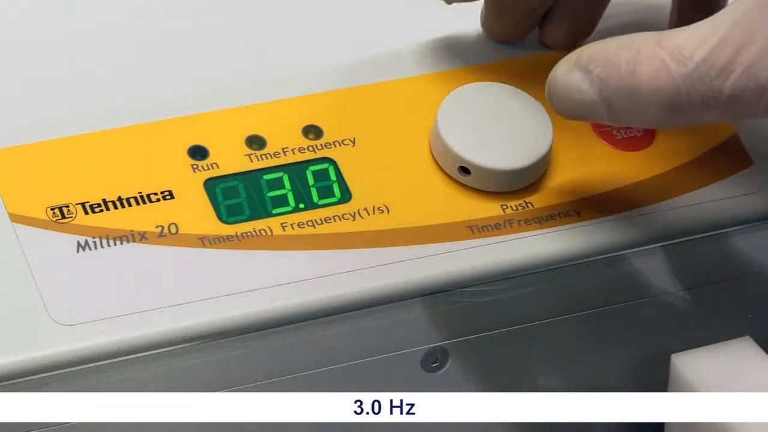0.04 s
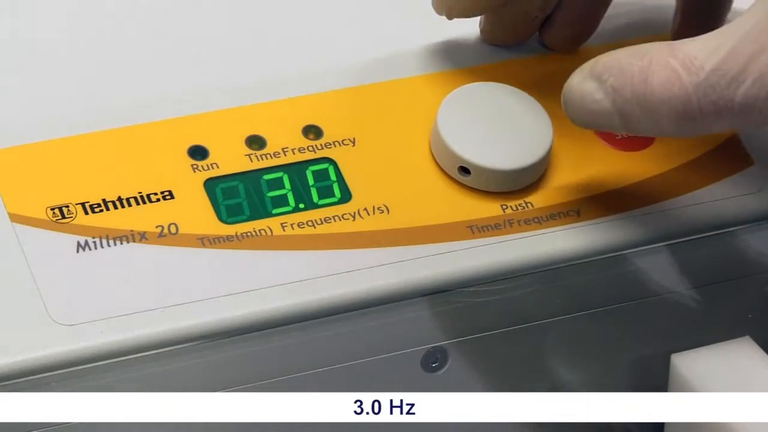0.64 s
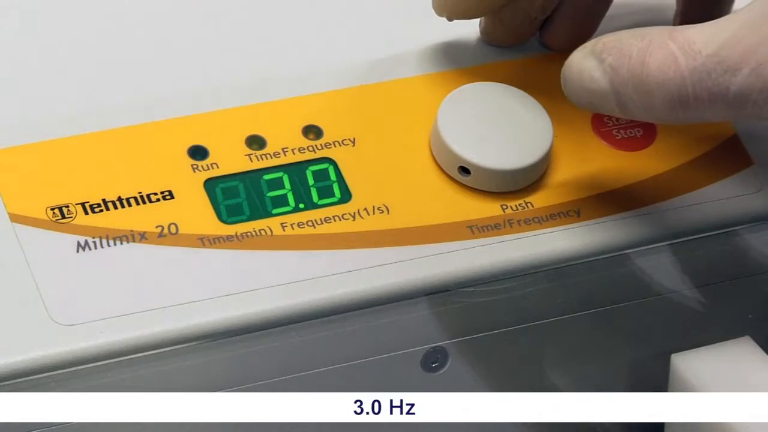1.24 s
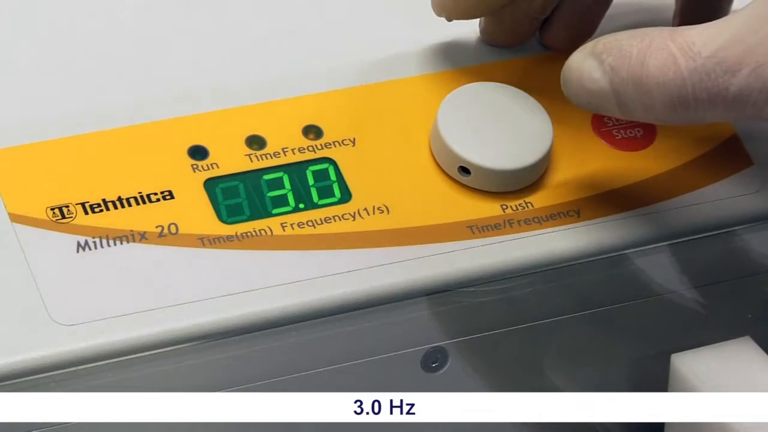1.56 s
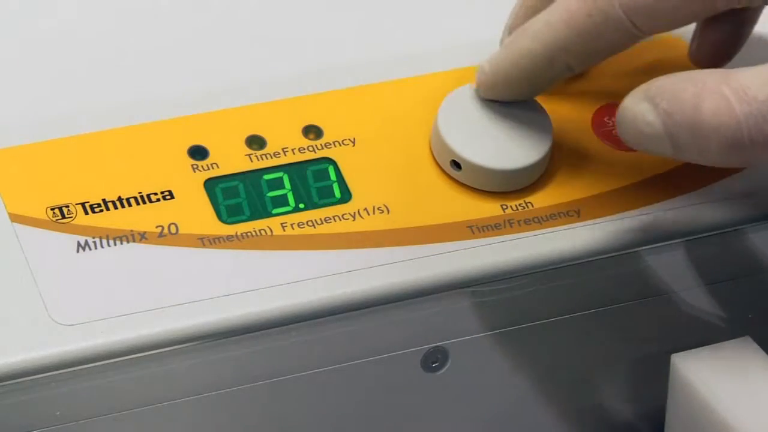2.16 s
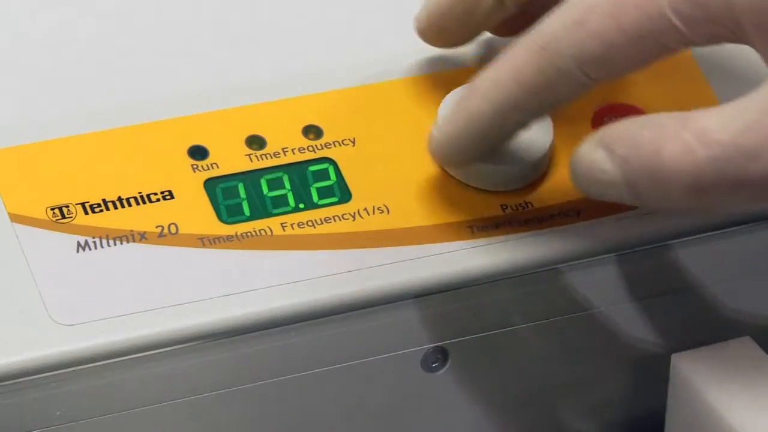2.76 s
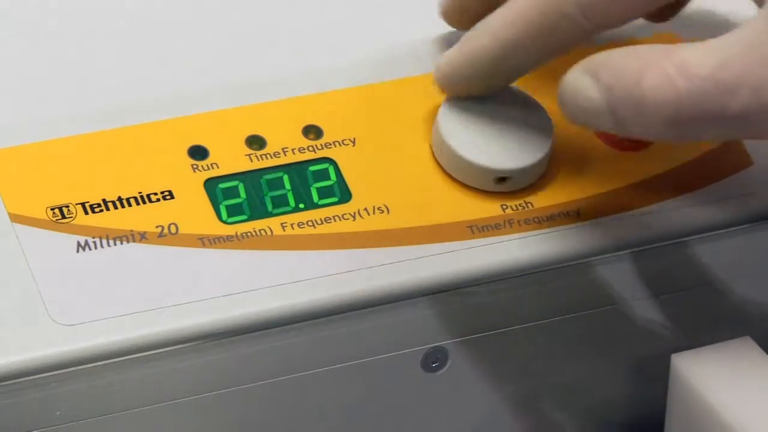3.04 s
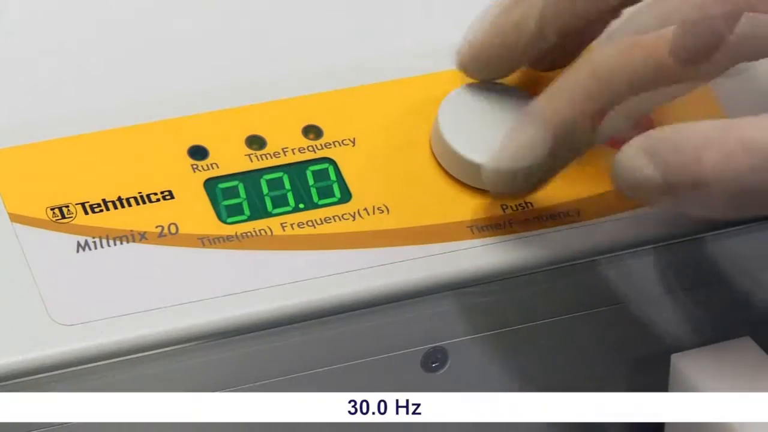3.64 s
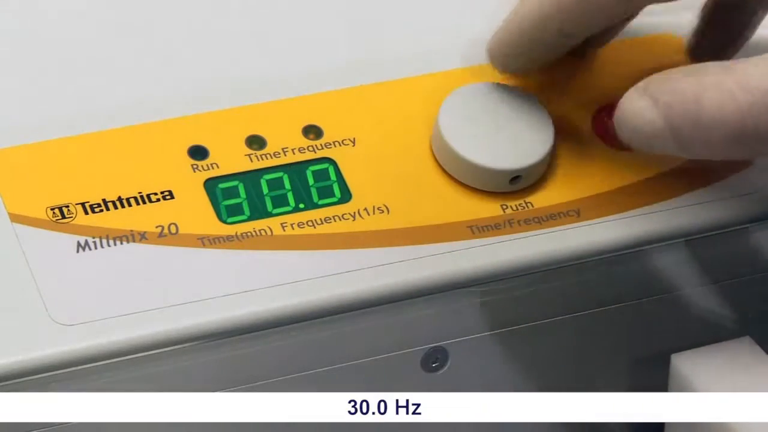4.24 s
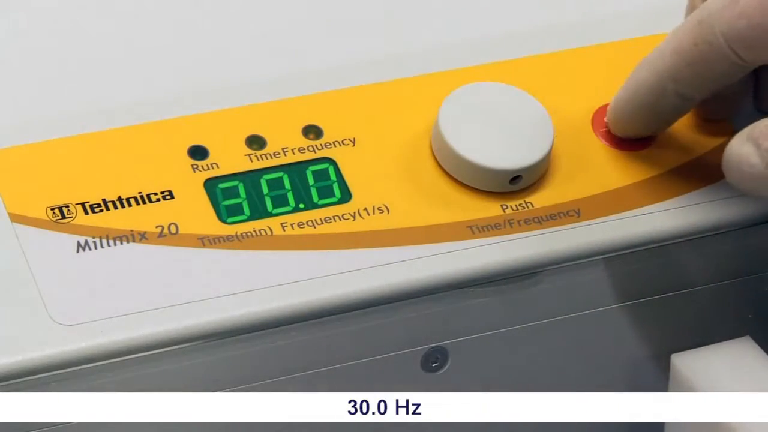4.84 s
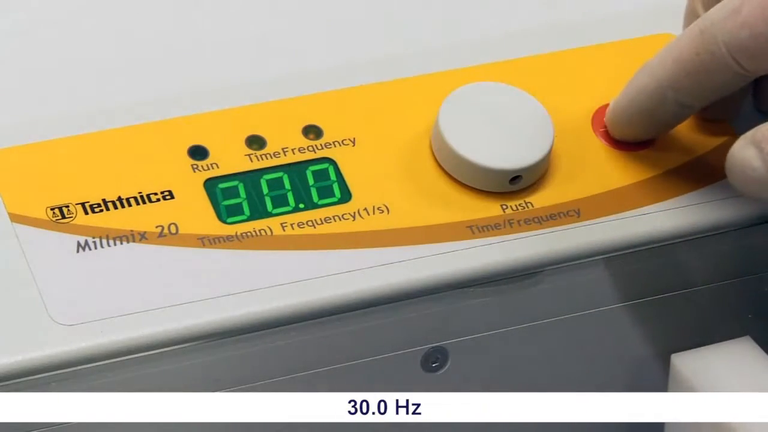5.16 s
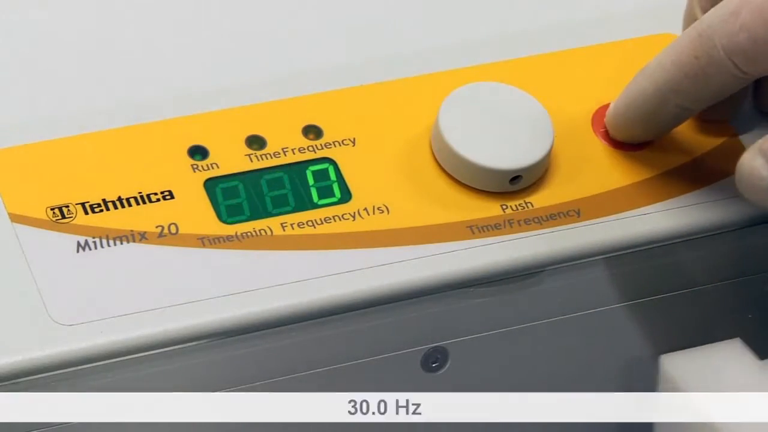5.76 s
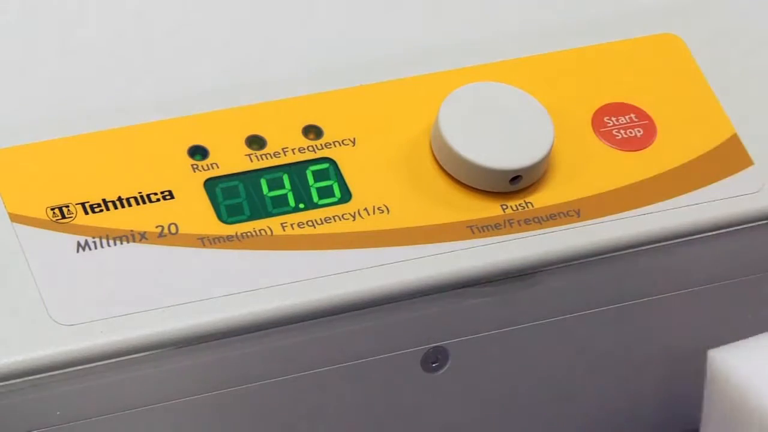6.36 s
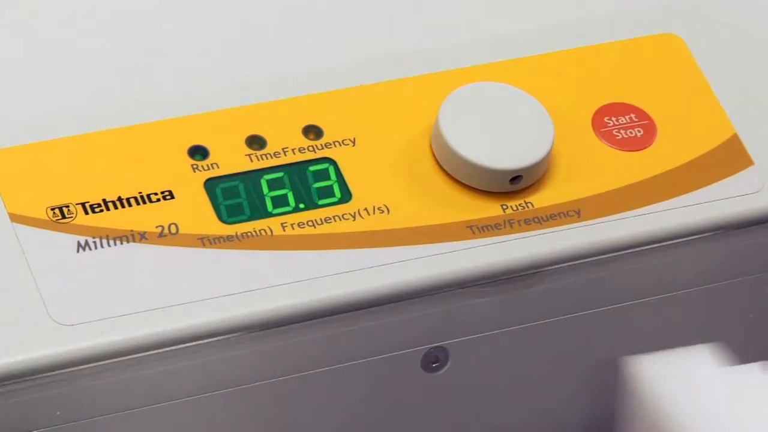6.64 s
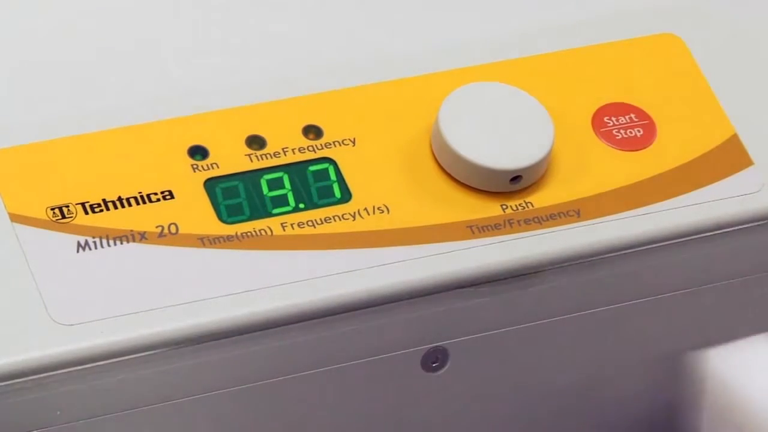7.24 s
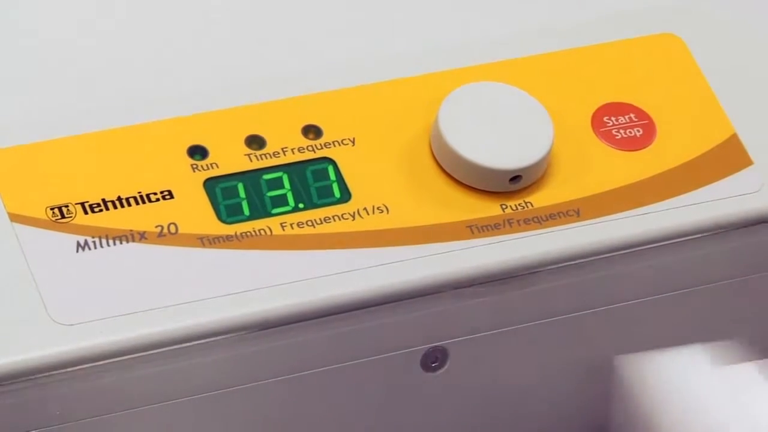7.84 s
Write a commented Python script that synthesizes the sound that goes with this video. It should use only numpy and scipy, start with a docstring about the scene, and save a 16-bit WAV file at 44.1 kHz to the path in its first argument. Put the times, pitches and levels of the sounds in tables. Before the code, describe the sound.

A low, quiet ventilation rumble runs throughout, deeper for the first two seconds, then slightly higher with a faint hum. A gloved hand brushes a control panel faintly at about 0.4 seconds and lightly bumps a knob at 0.8. At 2.9 comes a louder, dull double bump with a glove rustle and brief low ring. The sound sits on the left until about 3.9, then centres. More faint brushes precede a soft button click at 5.6.

At 5.7 a small ball mill clunks into motion, and its motor buzzes and whines upward over a low rumble. From about 6.3 steel balls roll, slide and knock inside the swinging jars. The knocks combine thuds, clacks and metallic ringing, growing faster and harder into a loud, rapid rattle that is still building at 8 seconds. One microphone by the laboratory bench catches short room reflections.

```python
"""A quiet, ventilated laboratory, one microphone by the bench where a small ball mill stands.
Over the rumble of the air, a gloved hand brushes the panel, bumps the knob and presses start.
The drive takes up its slack and the stepper motor whines upward. The steel balls knock against
the ends of the swinging jars, twice a cycle, ever faster and harder, ringing housing, holders
and jars. Bench and walls add short reflections."""
import sys
import numpy as np
from scipy import signal
from scipy.fft import rfft, irfft
from scipy.io import wavfile

SR = 44100
rng = np.random.default_rng(int(sys.argv[2]) if len(sys.argv) > 2 else 0)


def materialize(psi):
    """Save the field psi as 16-bit PCM at rate SR to the path in sys.argv[1].

    A 1-D psi becomes a single channel; in a 2-D psi each row is a channel.
    """
    bounded = np.clip(np.atleast_2d(psi).T, -1, 1)
    quanta = np.round(bounded * 32767).astype(np.int16)
    wavfile.write(sys.argv[1], SR, quanta)


N = 352359
TIME = np.arange(N) / SR

# colour of room tone, slowed down and at normal speed, and of the glove: frequency_hz, relative_db
SLOWED_TONE_SPECTRUM = [(29, -63), (50, -9), (70, -9), (177, -2.5), (253, -1.5), (371, -13), (439, -12.5),
                        (557, -19.5), (898, -20.5), (1200, -25), (1310, -24), (2120, -32), (15000, -33)]
AIR_SPECTRUM = [(29, -51), (50, -8), (70, -7), (100, -17), (134, -7.5), (162, -7.5), (238, 0), (268, -3.5),
                (333, 1.5), (434, -10), (592, -13.5), (735, -18.5), (1790, -26), (3180, -32),
                (15500, -33.5)]
GLOVE_SPECTRUM = [(300, -5), (800, 6.5), (2200, -2.5), (3700, -0.5), (5000, -4), (7000, 1), (9500, -4.5),
                  (12000, -5), (15500, -11)]
# hum of ventilation and electronics: pitch_hz, level_db
HUM_TONES = [(27.3, -66), (88, -82.5), (110, -76.5), (167, -73), (1782, -89.5), (2126, -93.5)]
# glove on the panel, stepper breaking away, slow balls sliding on the jar wall: peak_s, fade_s, level_db
GLOVE_BRUSHES = [(.35, 0.13, -72), (2.905, 0.075, -62), (4.145, 0.14, -75), (5.43, 0.072, -66)]
BREAKAWAY_BUZZES = [(5.99, 0.056, -68), (6.10, 0.061, -66)]
BALL_SLIDES = [(6.296, 0.013, -58), (6.497, 0.011, -54)]
# a finger bumps the knob; the start key snaps in: start_s, level_db, decay_s
KNOB_BUMPS = [(0.795, -62, 0.011), (1.597, -72, .004), (2.913, -43.5, 0.009), (2.951, -54, 0.0083)]
KEY_SNAP = [(5.562, -71, 0.018)]
# resonances of the mill's parts: pitch_hz, width_hz, relative_db
KNOB_MODES = [(70, 20, -23), (110, 58, 2), (171, 98, 3), (275, 26, 4.5), (410, 71, -7), (520, 41, -3),
              (662, 68, -2), (800, 150, -10), (1160, 120, -16)]
KEY_MODES = [(3470, 890, -1.8), (4250, 600, -0.19)]
FRAME_MODES = [(165, 13, -13), (230, 14, 3), (296, 26, -1), (388, 28, -2.5), (436, 29, -5), (591, 34, -2.5),
               (1199, 52, 5)]
STATOR_MODES = [(1057, 60, 1), (1230, 46, -2.4)]
HOUSING_MODES = [(87.4, 7.6, -10), (109, 26, -18), (155.4, 56, -10.5), (239, 20, -7), (334, 61, -13),
                 (397, 27, -14), (438, 61, -1), (535.4, 61, 0), (561.7, 38.7, 3), (605, 33, -2),
                 (672, 99, -13.5)]
HOLDER_MODES = [(860, 35, -1), (989, 49, 0), (1104, 106, 6), (1186, 280, 0), (1396, 80, 0.5),
                (1490, 75, -1), (1666, 120, -3), (1856, 143, -4.5), (2100, 350, -8), (2550, 490, -10),
                (2890, 240, -17.5), (3790, 130, -15), (4050, 2100, -20)]
JAR_MODES = [(3068, 110, 7), (3157, 106, 5.7), (3260, 174, 1)]
STEEL_MODES = [(4590, 130, 2.5), (5000, 110, 6), (5590, 1170, -0.5), (5900, 345, 6), (6600, 170, 5),
               (6970, 146, 4), (7250, 81, 4), (9060, 820, -15.5), (10040, 190, -18), (12800, 4900, -33.5)]
# the drive takes up its slack: start_s, housing_db, holder_db, jar_db, decay_s
SLACK_CLUNKS = [(5.746, -54, -63.5, -72, 0.015), (6.258, -62, -64, -95, 0.065)]
# the stepper's force on the frame, at the tooth rate and each multiple: level_db
TOOTH_HARMONICS = [-67.5, -74.5, -92, -90, -84.5, -89.5]
# the running mill sways on its feet: time_s, level_db
SWAY_CURVE = [(5.9, -76), (6.2, -74.5), (6.5, -70), (6.82, -61), (7.1, -83), (7.4, -68), (7.99, -75)]
# knocks that stand out from the rest: near_s, strength_db, extra_ring_db
KNOCK_ACCENTS = [(6.286, 0, -18), (6.50, 7, 0), (6.59, -0.5, -0.5), (6.67, -0.5, 6), (6.94, 3.5, 0.5),
                 (6.997, 1, 3.5), (7.056, 3.5, 0), (7.106, -0.5, -3), (7.208, -0.5, -2), (7.257, 2.5, -0.5),
                 (7.303, 3, 1), (7.349, 1.5, -4), (7.479, 1.5, -5), (7.561, -1.5, -1.5), (7.639, 3.5, 2),
                 (7.754, 2, 2.5), (7.787, 0.5, -15)]

# how the mill's forces grow with the swing rate: base_db at REFERENCE_HZ, db_per_doubling
THUD, CLACK, RING, PING = (-37.5, 8.1), (-36.5, 10.9), (-44.5, 14.4), (-53.5, 19.8)
DRIVE, ROLL, SKITTER = (-48.5, 6.8), (-66, 7.9), (-56.5, 37)
REFERENCE_HZ = 12

NORMAL_SPEED_S, SLOWED_HUM_HZ = 2.04, 20.8
TREBLE_CUT_S, TREBLE_CUT_DB_PER_S, TREBLE_CUT_HZ = 6.9, 121, 7000
ROCKING_HZ, ROCKING_T60_S, ROCKING_DB = 86, 0.8, -50
START_S, SWING_HZ_PER_S, ROTOR_TEETH, FLUTTER_DB = 5.749, 6.744, 50, 3.5
# the faster the swing, the earlier in the stroke a constant lead makes the balls land
STROKES_BEFORE_LANDING, LANDING_LEAD_S = 2.297, 0.047
END_DELAY_S, END_RING_DB, KNOCK_SPREAD_DB, CHATTER_S = 0.0018, 2.0, 1.33, 0.0067
RIGHT_OPENS_S, CUTOFF_HZ = 3.885, 15750


def from_db(db):
    """Decibels to gain."""
    return 10 ** (np.asarray(db) / 20)


def noise(spectrum):
    """Steady noise of rms 1, coloured by rows of frequency_hz, relative_db."""
    hz, db = np.transpose(spectrum)
    bins = np.maximum(np.fft.rfftfreq(N, 1 / SR), 1)
    colour = from_db(np.interp(np.log(bins), np.log(hz), db))
    x = irfft(rfft(rng.standard_normal(N)) * colour, N)
    return x / np.sqrt(np.mean(x ** 2) + 1e-20)


def sine(hz):
    """Tone of rms 1 on a steady or gliding pitch."""
    return np.sqrt(2) * np.sin(2 * np.pi * np.cumsum(hz * np.ones(N)) / SR)


def swells(rows):
    """An envelope that rises and falls once per row of peak_s, fade_s, level_db."""
    return sum(from_db(db) * np.exp(-abs(TIME - s) / fade_s) for s, fade_s, db in rows)


def push(times, levels_db):
    """One clean, hard contact per blow."""
    force = np.zeros(N)
    force[np.clip(times * SR, 0, N - 1).astype(int)] = from_db(levels_db)
    return force


def chatter(times, levels_db, decays_s, rise_s=0.0033, contacts_per_s=3000):
    """Each blow is a quick swarm of tiny contacts that swells and dies away."""
    force, t = np.zeros(N + SR), TIME[:SR // 8]
    for s, db, decay_s in np.broadcast(times, levels_db, decays_s):
        swell = (1 - np.exp(-t / rise_s)) * np.exp(-t / decay_s)
        contacts = rng.choice([-1, 1], len(t)) * (rng.random(len(t)) < contacts_per_s / SR)
        burst = swell * contacts
        burst *= np.linalg.norm(swell / swell.max()) / (np.linalg.norm(burst) + 1e-9)
        start = int(s * SR)
        force[start:start + len(t)] += from_db(db) * burst
    return force[:N]


def resonate(force, modes, low_hz, high_hz):
    """Drive a part's resonances, inside the band that it radiates; overall power gain 1."""
    click, response = signal.unit_impulse(SR // 2) + 1e-18, 0
    for k, (hz, width, db) in enumerate(modes):
        r = np.exp(-np.pi * width / SR)
        poles = [1, -2 * r * np.cos(2 * np.pi * hz / SR), r * r]
        ring = (1 - r * r) * signal.lfilter([1, 0, -1], poles, click)
        response = response + (-1) ** k * from_db(db) * ring
    band = signal.butter(3, [low_hz, high_hz], "band", fs=SR, output="sos")
    response = signal.sosfilt(band, response)
    return signal.oaconvolve(force, response / np.linalg.norm(response))[:N]


def room(x, t60, wet_db):
    """Direct sound at the microphone, plus dense reflections from bench and walls."""
    t = TIME[:SR * 3 // 4]
    tail = rng.standard_normal(len(t)) * from_db(-60 * t / t60) * (1 - np.exp(-t / 0.0043))
    return x + from_db(wet_db) * signal.oaconvolve(x, tail / np.linalg.norm(tail))[:N]


def swing_hz(s):
    """Swings per second of the jars, speeding up evenly from rest."""
    return SWING_HZ_PER_S * np.maximum(s - START_S, 1e-3)


def level_at(s, growth):
    """Level in dB of a force that grows with the swing rate."""
    base_db, db_per_doubling = growth
    return base_db + db_per_doubling * np.log2(swing_hz(s) / REFERENCE_HZ)


def ventilation():
    """Room tone of air rumble and hum, played slowed down, so lower in pitch, for the first two seconds."""
    slowed = from_db(-61) * noise(SLOWED_TONE_SPECTRUM) + from_db(-66) * sine(SLOWED_HUM_HZ)
    normal = from_db(-61) * noise(AIR_SPECTRUM) + sum(from_db(db) * sine(hz) for hz, db in HUM_TONES)
    share = np.clip((TIME - NORMAL_SPEED_S) / 0.0085, 0, 1)
    return np.sqrt(1 - share) * slowed + np.sqrt(share) * normal


def hand():
    """The glove hisses over the panel, bumps the knob, which rocks the mill, and presses the key."""
    glove = swells(GLOVE_BRUSHES) * noise(GLOVE_SPECTRUM)
    bumps = chatter(*np.transpose(KNOB_BUMPS), rise_s=0.00059)
    knob = room(resonate(bumps, KNOB_MODES, low_hz=49.7, high_hz=1510), t60=0.7, wet_db=-1.5)
    hardest_s = max(KNOB_BUMPS, key=lambda bump: bump[1])[0]
    age = np.maximum(TIME - hardest_s, 0)
    rocking = from_db(ROCKING_DB - 60 * age / ROCKING_T60_S) * np.sin(2 * np.pi * ROCKING_HZ * age)
    key = resonate(chatter(*np.transpose(KEY_SNAP)), KEY_MODES, low_hz=2500, high_hz=5500)
    return glove + knob + rocking + key


def drive():
    """The drive clunks as it takes up its slack, then rumbles: forces on housing, holder and jar."""
    s, *levels_db, decay_s = np.transpose(SLACK_CLUNKS)
    on_housing, on_holder, on_jar = (chatter(s, db, decay_s) for db in levels_db)
    rumble = from_db(level_at(TIME, DRIVE)) * rng.standard_normal(N)
    return on_housing + rumble, on_holder, on_jar


def motor():
    """The stepper buzzes into motion; its rising whine swells at each resonance of the frame."""
    waver = 1 + 0.027 * noise([(1, -17.5), (20, 2.5), (45, -4.5), (90, -33), (300, -92)])
    tooth_hz = ROTOR_TEETH * swing_hz(TIME) * waver
    teeth = sum(from_db(db) * sine(k * tooth_hz) for k, db in enumerate(TOOTH_HARMONICS, 1))
    # the uneven load roughens the whine
    flutter = from_db(FLUTTER_DB * noise([(1, -2), (12, -11), (40, 2), (80, -19), (300, -80)]))
    whine = resonate((TIME > START_S) * flutter * teeth, FRAME_MODES, low_hz=145, high_hz=1520)
    stator = resonate(rng.standard_normal(N), STATOR_MODES, low_hz=940, high_hz=1370)
    return room(whine + swells(BREAKAWAY_BUZZES) * stator, t60=0.21, wet_db=-14.5)


def sway():
    """The running mill keeps swaying on its feet, a low, narrow rumble."""
    level_db = np.interp(TIME, *np.transpose(SWAY_CURVE))
    rumble = resonate(rng.standard_normal(N), [(ROCKING_HZ, 5, 0)], low_hz=73, high_hz=105)
    return (TIME > START_S) * from_db(level_db) * rumble


def rolling(first_landing_s):
    """The balls break loose just before they first land, roll with little treble and briefly slide."""
    contact = noise([(700, 2.5), (1200, 4.5), (1700, -1), (2300, 5), (3200, -24), (6000, -19)])
    loose_db = np.interp(TIME, [first_landing_s - 0.08, first_landing_s], [-8, 0])
    slides = swells(BALL_SLIDES) * rng.standard_normal(N)
    return from_db(level_at(TIME, ROLL) + loose_db) * contact + slides


def landings():
    """The balls land once at each end of the swing: time_s, strength_db, extra_ring_db."""
    last_stroke = SWING_HZ_PER_S * (N / SR - START_S + LANDING_LEAD_S) ** 2 - STROKES_BEFORE_LANDING
    stroke = np.arange(int(last_stroke) + 1)
    elapsed_s = np.sqrt((stroke + STROKES_BEFORE_LANDING) / SWING_HZ_PER_S)
    end = (-1.0) ** stroke   # at one end they land a little later and ring the jar more
    s = START_S - LANDING_LEAD_S + elapsed_s + END_DELAY_S * end
    strength_db = rng.normal(0, KNOCK_SPREAD_DB, len(s))
    extra_ring_db = END_RING_DB * end
    for near_s, accent_db, accent_ring_db in KNOCK_ACCENTS:
        nearest = np.argmin(abs(s - near_s))
        strength_db[nearest] = accent_db
        extra_ring_db[nearest] += accent_ring_db
    return s, strength_db, extra_ring_db


def knocks(s, strength_db, extra_ring_db):
    """A ball grazes the wall, then lands: forces on housing, holder, jar and steel."""
    thud_db = level_at(s, THUD) + 0.98 * strength_db
    clack_db = level_at(s, CLACK) + strength_db
    ring_db = level_at(s, RING) + 0.75 * strength_db + extra_ring_db
    ping_db = level_at(s, PING) + strength_db
    graze_s = s - 0.003
    thud = chatter(graze_s, thud_db - 7, CHATTER_S * 1.18) + push(s - 0.001, thud_db + 22)
    clack = chatter(graze_s, clack_db - 8, CHATTER_S * 2.33, rise_s=0.0041)
    ring = chatter(graze_s, ring_db - 2, CHATTER_S * 1.4, rise_s=0.0044)
    ring += push(s + 0.00191, ring_db + 16)
    ping = chatter(graze_s, ping_db - 4.5, CHATTER_S * 1.16, rise_s=0.0059, contacts_per_s=15000)
    return thud, clack, ring, ping


def skitter(landings_s, delay_s=0.008, fade_s=0.011):
    """Just after each landing the balls skitter brightly against one another."""
    envelope = swells((s + delay_s, fade_s, level_at(s, SKITTER)) for s in landings_s)
    return envelope * noise([(5000, -44), (8000, -13), (10000, 2), (15000, 7.5), (17000, -16.5)])


def mill():
    """Drive and balls shake the housing, jar holders, jar walls and steel; each rings into the room."""
    s, strength_db, extra_ring_db = landings()
    on_housing, on_holder, on_jar = drive()
    roll = rolling(s[0])
    thud, clack, ring, ping = knocks(s, strength_db, extra_ring_db)
    housing = resonate(on_housing + thud, HOUSING_MODES, low_hz=67, high_hz=750)
    holder = resonate(on_holder + roll + clack, HOLDER_MODES, low_hz=730, high_hz=4550)
    jar = resonate(on_jar + from_db(-1) * roll + ring, JAR_MODES, low_hz=2550, high_hz=4080)
    steel = resonate(ping + skitter(s), STEEL_MODES, low_hz=4100, high_hz=15000)
    return (room(housing, t60=0.18, wet_db=-12.5) + room(holder, t60=0.59, wet_db=-7)
            + room(jar, t60=0.61, wet_db=-2) + room(steel, t60=0.47, wet_db=-4))


def treble_cut(x):
    """A treble cut, like a noise suppressor's, removes the hiss above 7 kHz from 6.9 s."""
    dull = signal.sosfilt(signal.butter(8, TREBLE_CUT_HZ, fs=SR, output="sos"), x)
    kept = from_db(-TREBLE_CUT_DB_PER_S * np.maximum(TIME - TREBLE_CUT_S, 0))
    return kept * x + (1 - kept) * dull


def scene():
    """Everything reaches one microphone, fed to both channels."""
    return np.tile(mill() + motor() + sway() + hand() + treble_cut(ventilation()), (2, 1))


def record(dry):
    """The right channel is almost silent until it opens; both lose the very top of the treble."""
    right_gain = from_db(np.interp(TIME, [RIGHT_OPENS_S - 0.005, RIGHT_OPENS_S], [-33, 0]))
    lowpass = signal.ellip(10, 0.2, 70, CUTOFF_HZ, fs=SR, output="sos")
    return signal.sosfilt(lowpass, np.array([dry[0], dry[1] * right_gain]))


dry = scene()
out = record(dry)
materialize(out)
```